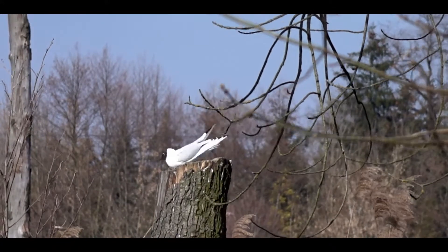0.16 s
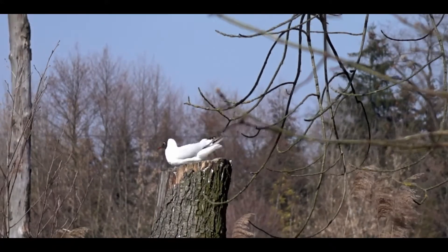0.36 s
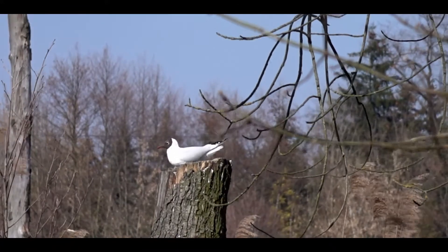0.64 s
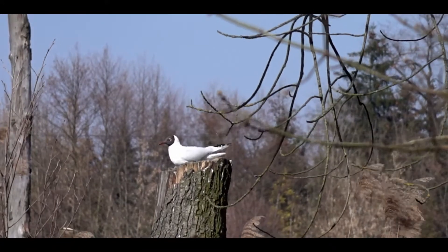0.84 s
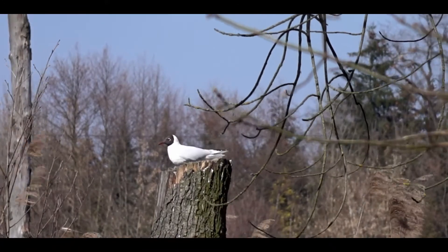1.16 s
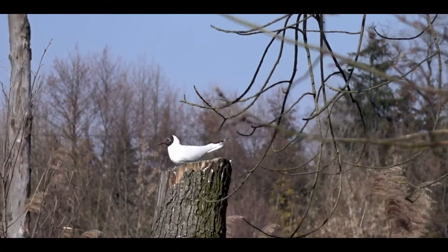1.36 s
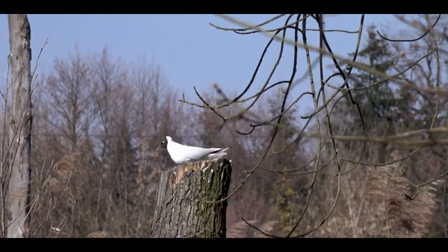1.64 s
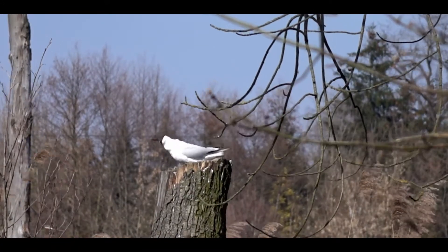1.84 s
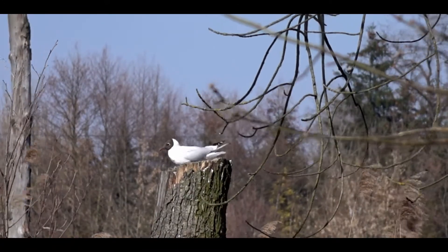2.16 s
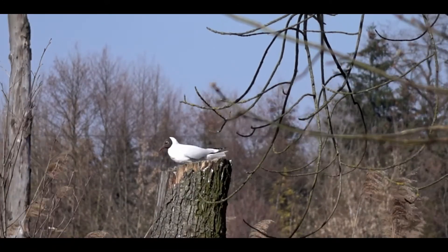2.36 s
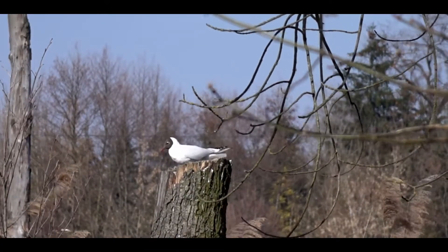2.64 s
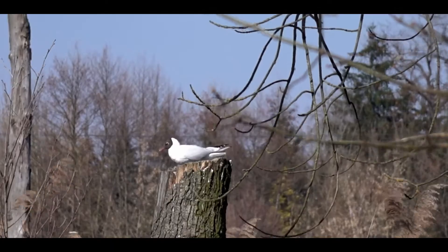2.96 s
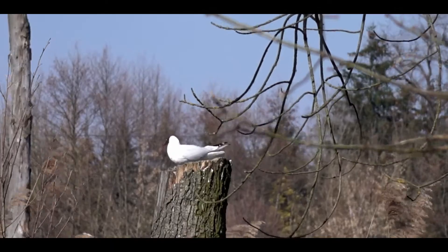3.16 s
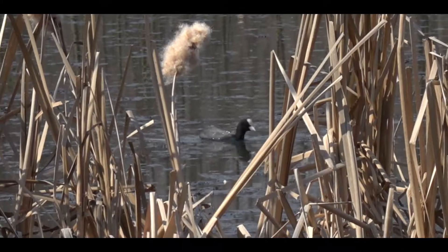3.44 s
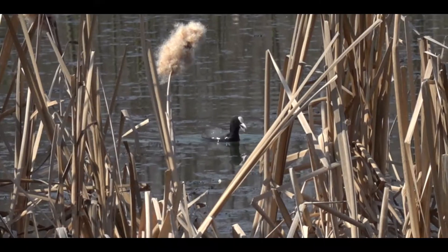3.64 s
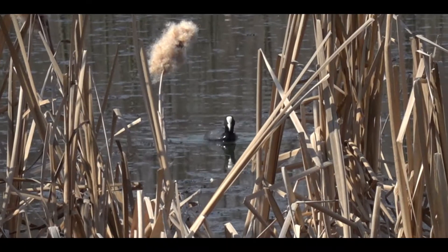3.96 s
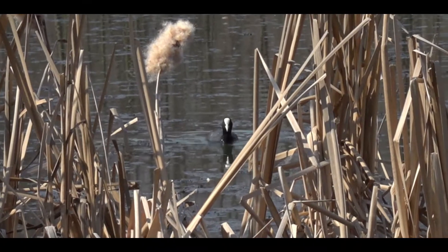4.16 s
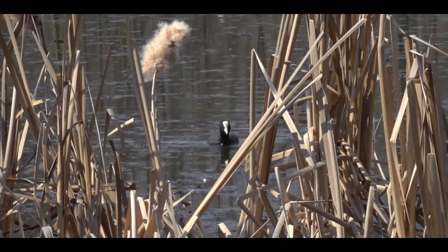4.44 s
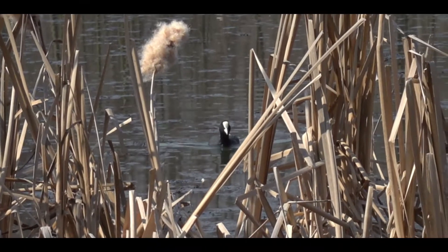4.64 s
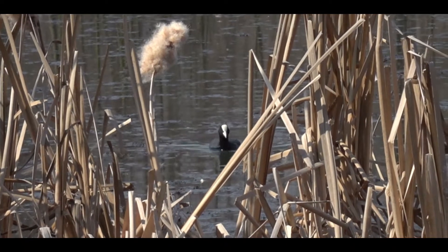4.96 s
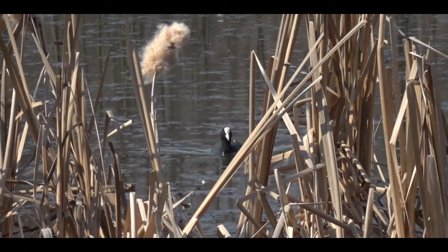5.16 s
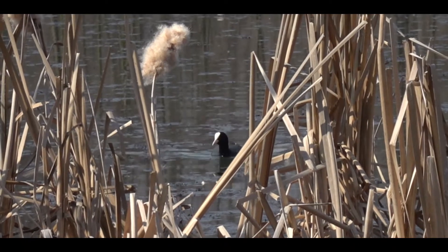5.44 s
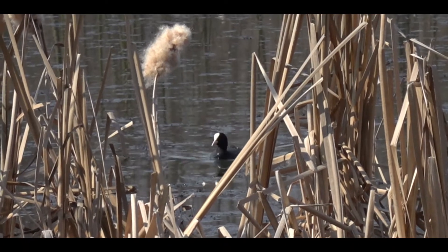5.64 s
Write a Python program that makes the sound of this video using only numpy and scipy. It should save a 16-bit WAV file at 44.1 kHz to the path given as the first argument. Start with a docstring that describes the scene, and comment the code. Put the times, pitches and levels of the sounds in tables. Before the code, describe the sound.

A large colony of gulls calls throughout over a shallow lake, a dense chorus of overlapping cries that swells and ebbs. From the start, closer gulls give harsh, rattling cries and short yelps, with a light echo off the trees. Low wind rumbles on the microphone, gusting at the very beginning and again around 3 to 3.5 seconds. A high, wheezy shriek and two soft, dull mews come between 1 and 1.6 seconds, and more shrieks follow near 2.6 and 4 seconds. A small songbird twitters faintly at about 3 seconds, followed by a run of quick gull yelps. Just after 4 seconds the wind dies down and the flock eases slightly. The loudest shriek comes at about 4.7 seconds, trailed by weaker ones. A few hoarse cries from 5.4 seconds to nearly 6 seconds close over the continuing chorus.

```python
"""A colony of black-headed gulls calls over a shallow lake, each call a harmonic tone on a pitch arch,
most of them chopped into a rattle of about ninety bursts a second. From the start, close gulls cry and
yelp over the flock, the trees echo and wind rumbles at the microphone. Shrieks and two soft mews join
after 1 s, and a songbird twitters at 3 s. Just after 4 s the wind dies down; the loudest shriek follows
at 4.7 s, and a few hoarse cries end the scene."""
import sys
import numpy as np
from scipy import signal
from scipy.fft import rfft, irfft, next_fast_len
from scipy.io import wavfile
from scipy.ndimage import uniform_filter1d

SR = 44100
rng = np.random.default_rng(int(sys.argv[2]) if len(sys.argv) > 2 else 0)


def materialize(psi):
    """Save the field psi as 16-bit PCM at rate SR to the path in sys.argv[1].

    A 1-D psi becomes a single channel; in a 2-D psi each row is a channel.
    """
    bounded = np.clip(np.atleast_2d(psi).T, -1, 1)
    quanta = np.round(bounded * 32767).astype(np.int16)
    wavfile.write(sys.argv[1], SR, quanta)


N = 255339
TIME = np.arange(N) / SR


def gain_of(db):
    """The decibel scale: 20 dB is a factor of ten in amplitude."""
    return 10 ** (np.asarray(db) / 20)


def unit_rms(x):
    """Normalisation to a mean power of 1."""
    return x / np.sqrt(np.mean(x ** 2) + 1e-20)


def value_at(points, hz):
    """Interpolation along a logarithmic frequency axis."""
    f, value = np.transpose(points)
    return np.interp(np.log(hz + 1), np.log(f + 1), value)


def add(mix, s, sound):
    """Superposition: a sound joins the mix at time s."""
    at = round(s * SR)
    sound = sound[max(-at, 0):]
    part = mix[max(at, 0):][:len(sound)]
    part += sound[:len(part)]


def wander(t, per_s):
    """Random modulation: straight lines join per_s Gaussian values a second."""
    knots = rng.standard_normal(2048)
    return np.interp(t * per_s, np.arange(len(knots)), knots)


def bump(s, width_s):
    """A Gaussian envelope of height 1 around time s."""
    return np.exp(-((TIME - s) / width_s) ** 2)


def coloured(x, db_at, scatter_rad=0):
    """Linear filtering by a curve from Hz to dB, to rms 1; scatter shifts the partials' phases."""
    size = next_fast_len(len(x) + 512)
    hz = np.fft.rfftfreq(size, 1 / SR)
    response = gain_of(db_at(hz)) * np.exp(1j * scatter_rad * wander(hz, 1 / 700))
    return unit_rms(irfft(rfft(x, size) * response, size)[:len(x)])


def noise(spectrum):
    """Spectral shaping of white noise."""
    return coloured(rng.standard_normal(N), lambda hz: value_at(spectrum, hz))


def still_air():
    """Stationary noise: the faint ambient floor."""
    # (frequency [Hz], relative spectral density [dB])
    spectrum = [(20, -17), (70, 3), (130, -4), (280, -12), (600, -4.5), (2000, -14), (8000, -26),
                (15500, -59)]
    return gain_of(-34.5) * noise(spectrum)


def wind(breeze_db=-23.5, calm_db=-36.5, calm_at_s=4.14, fade_s=.12):
    """Turbulence at the microphone: a low rumble that gusts, then dies down."""
    # (frequency [Hz], relative spectral density [dB])
    spectrum = [(3, -16), (8, 6), (15, 2), (28, -13.5), (45, -12), (70, -21.5), (120, -34.5), (250, -35.5),
                (500, -43.5), (1500, -75)]
    # (time [s], half width [s], rise [dB])
    gusts = [(0.23, .14, 7), (2.1, 0.17, 0.5), (2.973, 0.11, 8), (3.56, 0.39, 4.5)]
    db = np.interp(TIME, [calm_at_s, calm_at_s + fade_s], [breeze_db, calm_db])
    db += sum(rise_db * bump(s, width_s) for s, width_s, rise_db in gusts)
    db += 2 * wander(TIME, per_s=9)
    return gain_of(db) * noise(spectrum)


def shore_echo(x, onset_s=0.0094):
    """Reverberation: scattering off trees and reeds leaves a tail whose treble dies first."""
    # (frequency [Hz], time to decay by 60 dB [s])
    decay_times = [(300, 1), (2000, 1.0), (5000, 0.59), (10000, 0.79), (16000, 0.22)]
    reflections = rng.standard_normal(SR) * (rng.random(SR) < .05)
    hz, t, bands = signal.stft(reflections, SR, nperseg=256)
    decay = gain_of(-60 * t / value_at(decay_times, hz)[:, None])
    onset = 1 - np.exp(-t / onset_s)
    tail = signal.istft(bands * decay * onset, SR, nperseg=256)[1]
    return signal.fftconvolve(x, tail / np.linalg.norm(tail))[:N]


def syrinx(length, swell_db, pitches, rattle_hz, rasp, depth=0.97, hiss=1.0, doubling=0.33,
           edge_s=0.031, drop=0, drop_s=.016, sweep=0):
    """Amplitude modulation chops a harmonic tone into bursts; rasp adds pitch jitter and turbulence."""
    t = np.arange(round(length * SR)) / SR
    progress = t / length
    beat = np.cumsum(rattle_hz * (1 + 0.1 * wander(t, 57.3))) / SR
    burst = np.tanh(2.218 * np.sin(np.pi * beat) ** 2)  # flat-topped, with short gaps
    detune = rng.standard_normal(64)[beat.astype(int)]  # one value a burst
    hz = np.polyval(np.polyfit([0, .5, 1], pitches, 2), progress)
    hz *= 1 - drop * np.exp((t - length) / drop_s)  # the pitch collapses at the end
    hz *= 1 + sweep * rasp * (beat % 1 - .5)  # hoarse bursts chirp upward
    hz *= 1 + .045 * rasp * detune
    jitter = rasp * 0.0523 * wander(t, 900)
    hz *= 1 + 0.04504 * (burst - .85) + jitter  # each burst lifts at its middle
    phase = 2 * np.pi * np.cumsum(hz) / SR
    phasor = np.exp(1j * phase)
    tone = (phasor * (1 - phasor ** 16) / (1 - phasor + 1e-9)).real  # 16 equal harmonics
    # fits of period doubling put lines halfway between the harmonics
    tone *= 1 + doubling * wander(t, 248.2) * np.cos(phase / 2)
    # turbulence takes over toward the treble
    turbulence = signal.lfilter([1, -.85], [1], rng.standard_normal(SR // 2))[:len(t)]
    voice = (1 - rasp) * unit_rms(tone) + hiss * rasp * turbulence
    gate = 1 - depth + depth * burst
    swell = gain_of(wander(t, 81.0) + swell_db * progress)
    edges = signal.windows.tukey(len(t), np.clip(2 * edge_s / length, 0, 1))
    return unit_rms(voice * gate * swell * edges)


def crowd(spectrum, count, pitch_hz, spread_octaves, rasp, echo_db):
    """Incoherent addition: cries of random pitch, length and distance merge, held at a steady level."""
    birds = np.zeros(N)
    for k, (when, duration, tilt, pitch, distance) in enumerate(rng.random((count, 5))):
        middle_hz = pitch_hz * 2 ** (spread_octaves * (2 * pitch - 1))
        pitches = middle_hz * np.array([.76 + .32 * tilt, 1, 1.04 - .26 * tilt])  # some rise, some fall
        cry = syrinx(.12 + .2 * duration, 0, pitches, 70 + 25 * tilt, rasp)
        start_s = (k + when) / count * (N / SR + .3) - .3
        add(birds, start_s, gain_of(-9 * distance) * cry)
    birds += gain_of(echo_db) * shore_echo(birds)
    # the sum is flattened, then takes the colour of the throats and the air between
    f, power = signal.welch(birds, SR, nperseg=512)
    power += 0.01 * power.mean()
    birds = coloured(birds, lambda hz: value_at(spectrum, hz) - 10 * np.log10(np.interp(hz, f, power)))
    return birds / np.sqrt(uniform_filter1d(birds ** 2, SR // 8) + 1e-6)


def chorus(colony_follow=.25):
    """Slow amplitude modulation: the flock swells, ebbs and pauses; the far colony follows a little."""
    # both: (frequency [Hz], relative spectral density [dB])
    colony_spectrum = [(150, -8.5), (250, -15.5), (525, -11), (635, -4.5), (717, -2.5), (809, -2),
                       (1030, -1.5), (1220, -1.5), (1330, 1), (1430, 3.5), (1920, 5), (2160, -8.5),
                       (3160, -25), (3510, -19.5), (15500, -44.5)]
    flock_spectrum = [(300, -23.5), (1000, -21.5), (1500, -4), (1900, 4.5), (2250, 0), (2600, -6),
                      (3200, -10.5), (4400, -9.5), (5500, -16.5), (8000, -35), (10500, -54), (15500, -72)]
    # strength of the calling: (time [s], relative level [dB])
    calling = [(0.0, -32), (0.14, -23.5), (0.48, -21), (1.1, -23), (2.42, -18.5), (2.69, -20.5),
               (2.95, -21.5), (3.18, -20.5), (3.47, -22), (3.69, -22), (3.98, -19.5), (4.18, -23.5),
               (4.45, -25), (4.66, -25.5), (5.47, -21), (5.66, -22.5), (5.79, -23)]
    # (time [s], half width [s], flock change [dB], colony change [dB])
    pauses = [(1.107, 0.054, -6.5, -2.5), (1.536, 0.054, -11, 2.5), (4.297, 0.1, -3.5, -8),
              (5.362, 0.087, -7.5, -1.5)]
    calling_db = np.interp(TIME, *np.transpose(calling))
    flock_db = calling_db - 2.0
    colony_db = -18.5 + colony_follow * calling_db
    for s, width_s, near_db, far_db in pauses:
        flock_db += near_db * bump(s, width_s)
        colony_db += far_db * bump(s, width_s)
    flock = crowd(flock_spectrum, count=80, pitch_hz=964.6, spread_octaves=.3, rasp=0.2774, echo_db=-3.5)
    colony = crowd(colony_spectrum, count=185, pitch_hz=798.1, spread_octaves=.55, rasp=0.3197,
                   echo_db=-2)
    return gain_of(flock_db) * flock + gain_of(colony_db) * colony


def songbird():
    """Frequency modulation of a pure tone: quick gliding whistles with a slight tremble."""
    # (time [s], length [s], level [dB], first pitch [Hz], last pitch [Hz])
    notes = [(3.015, 0.029, -38, 4670, 5000), (3.044, 0.023, -37, 5550, 4100),
             (3.065, 0.028, -33, 4700, 5800), (3.09, 0.027, -36, 5400, 4400),
             (3.388, 0.083, -51, 8100, 8400), (3.453, 0.041, -45, 8070, 8400)]
    song = np.zeros(N)
    for s, length, db, first_hz, last_hz in notes:
        t = np.arange(round(length * SR)) / SR
        hz = np.linspace(first_hz, last_hz, len(t)) * (1 + 0.04 * wander(t, 380))
        whistle = np.sin(2 * np.pi * np.cumsum(hz) / SR) * np.hanning(len(t))
        add(song, s, gain_of(db) * unit_rms(whistle))
    return song


def near_calls(rows, throat, arch_octaves, rattle_hz, doubling=0.4, hiss=0.91, wheeze_leak=0,
               air_loss=0, shut_db_per_octave=-8, **voicing):
    """Source and filter: the syrinx sounds through throat and beak, brightest when the beak is widest."""
    wheeze_hz = 9450, 11400  # the wheeze band fades in over this range

    def call(length, db, pitch, glide, rasp=0.25, treble_db=0, ring_hz=3000, ring_db=0, wheeze_db=0):
        def throat_db(hz):
            treble = treble_db * np.clip(np.log2((hz + 1) / 2200), 0, 1)
            ring = ring_db / (1 + ((hz / ring_hz - 1) / 0.07) ** 2)
            absorption_db = air_loss * min(db + 17, 0)  # air dulls the weaker, farther calls
            top = (wheeze_db + absorption_db) * np.interp(hz, wheeze_hz, [0, 1])
            return value_at(throat, hz) + treble + ring + top

        def shut_beak_db(hz):
            dulling = shut_db_per_octave * np.log2(np.maximum(hz / 3800, 1))
            return dulling * np.interp(hz, wheeze_hz, [1, 1 - wheeze_leak])

        pitches = pitch * 2 ** np.array([-arch_octaves - glide / 2, 0, -arch_octaves + glide / 2])
        swell_db = 20 * glide  # a rising call grows louder, a falling one fades
        slowed_hz = rattle_hz * (1 - .5 * rasp)  # hoarseness slows the rattle
        voice = syrinx(length, swell_db, pitches, slowed_hz, rasp, doubling=doubling, hiss=hiss, **voicing)
        wide = coloured(voice, throat_db, scatter_rad=1.3)
        half_shut = coloured(wide, shut_beak_db)
        opening = np.sin(np.linspace(0, np.pi, len(voice)))
        return opening * wide + (1 - opening) * half_shut

    direct, scattered = np.zeros((2, N))
    for s, length, db, *shape in rows:
        sound = call(length, db, *shape)
        add(direct, s, gain_of(db) * sound)
        add(scattered, s, gain_of(-17 + 0.71 * db) * sound)  # the echo loses less with distance
    return direct + shore_echo(scattered)


def mews():
    """A low throat resonance favours the first harmonics: soft, dull calls."""
    # (time [s], length [s], level [dB], pitch [Hz], glide [octaves])
    calls = [(1.17, 0.158, -29, 835, -0.058), (1.50, 0.108, -29.5, 1323, .05)]
    # (frequency [Hz], relative gain [dB])
    throat = [(400, -23), (850, -1), (1350, 4), (2500, -26), (8000, -50)]
    return near_calls(calls, throat, arch_octaves=.1, rattle_hz=80, depth=1.0, edge_s=0.023, drop=0.057)


def yelps():
    """Shallow modulation leaves these short calls clear, with hardly any rattle."""
    # (time [s], length [s], level [dB], pitch [Hz], glide [octaves])
    calls = [ (.145, .056, -23, 1110, -0.19), (1.01, 0.024, -24, 1153, -0.048),
             (1.07, 0.068, -28.5, 1130, -0.055), (1.38, 0.1, -24.5, 1082, -0.13),
             (3.25, 0.06, -17, 1134, 0.167), (3.385, 0.045, -21, 1100, 0.2),
             (3.44, 0.085, -31, 1058, -0.15), (3.58, 0.112, -30, 1203, 0.049),
             (3.76, 0.057, -23.5, 1157, 0.01), (3.90, 0.063, -26, 1130, 0.092),
             (4.12, 0.054, -27.5, 1130, 0.068)]
    # (frequency [Hz], relative gain [dB])
    throat = [(500, -40), (1100, -23), (2000, 10), (2350, -2.5), (3300, -18), (4500, -17), (10000, -45)]
    return near_calls(calls, throat, arch_octaves=0.0697, rattle_hz=104.3, depth=0.13, edge_s=0.017,
                      drop=0.028)


def shrieks():
    """A narrow throat resonance rings in the upper partials of these high, wheezy calls."""
    # (time [s], length [s], level [dB], pitch [Hz], glide [octaves], rasp [0-1], treble [dB],
    #  resonance [Hz], resonance gain [dB], wheeze [dB])
    calls = [ (1.145, 0.18, -27, 1115, 0.047, .27, 5, 3000, 10, 3),
             (1.33, 0.16, -39.5, 1130, 0, 0.13, -4, 5500, 11, -4),
             (2.56, 0.2, -25, 1207, 0.054, 0.23, 13, 3110, 20.2, -3),
             (3.72, 0.23, -33.5, 1240, .04, 0.36, -13, 3730, 29, 0),
             (3.982, .218, -26.5, 1178, -.06, .33, 0.5, 3290, 13, 4),
             (4.68, .045, -28.5, 1145, .1, 0.52, -2, 3500, 11, -2),
             (4.72, 0.13, -15.5, 1258, 0.0012, 0.303, -5, 3710, 12.7, -1),
             (4.845, 0.15, -29, 1343, -.1, 0.26, -1, 3800, 3, -2),
             (5.025, 0.12, -33, 1218, 0.03, 0.23, 1, 7800, 7, -9),
             (5.54, 0.16, -33, 1204, 0, .8, -8, 7900, 9.6, -12)]
    # (frequency [Hz], relative gain [dB])
    throat = [(600, -44), (1300, 1), (2500, 8.5), (3700, 10), (5000, 10.5), (6000, 10), (7000, 1.5),
              (8600, 2.5), (10300, -12.5), (12500, -12.5), (16000, -17)]
    return near_calls(calls, throat, arch_octaves=.095, rattle_hz=97, depth=0.91, edge_s=.004, drop=0.019,
                      sweep=.17, doubling=0.48, hiss=0.86, shut_db_per_octave=-11.5, wheeze_leak=0.98)


def cries():
    """Deep modulation makes a harsh rattle, coloured by the formants of the throat."""
    # (time [s], length [s], level [dB], pitch [Hz], glide [octaves], rasp [0-1], treble [dB])
    calls = [ (-.08, 0.16, -17, 895, 0.07, 0.23, 3), (.185, .22, -17.5, 866, .27, .36, -1.5),
             (.38, 0.096, -26.5, 764, -0.49, 0.16, -2), (.52, 0.2, -16.7, 910.4, .18, .38, 0),
             (.83, 0.11, -21, 936, 0.15, 0.56, 3.5), (.93, 0.12, -20.5, 915, -.03, 0.37, 0),
             (1.2, 0.17, -24, 850, .15, 0.41, -8), (1.59, 0.15, -25, 960, -.05, 0.42, 10),
             (1.75, 0.23, -19.5, 990, -.13, 0.49, -2), (1.95, 0.2, -27, 1010, .03, 0.77, 1),
             (2.23, 0.19, -17.5, 981, 0, 0.61, -11.5), (2.31, .26, -25.5, 994, -.1, 0.34, 1.5),
             (2.76, 0.19, -25, 968, .02, .24, 13), (2.93, 0.11, -22, 985, .1, 0.58, -6),
             (3.03, 0.21, -21, 926, -.17, 0.31, -5), (3.72, .13, -27, 900, .04, 0.68, -11),
             (3.87, .11, -22, 930, 0, 0.82, -10), (3.99, .15, -23, 930, -.04, 0.2, -1),
             (4.41, 0.16, -30, 900, .04, 0.74, -2.5), (4.54, 0.17, -27.5, 880, -.06, 0.56, 1),
             (5.40, 0.16, -25.5, 835, .1, 0.55, -12), (5.54, 0.14, -24.5, 860, 0, 0.78, -5.5),
             (5.70, 0.23, -24, 880, .1, 0.62, -3)]
    # (frequency [Hz], relative gain [dB])
    throat = [(400, -56), (900, -12.5), (1350, -3), (1700, 3), (1950, 6), (2300, -20.5), (2750, -5.5),
              (3300, -30), (3750, -6), (4450, -3), (5400, -15), (7200, -20.5), (8800, -28.5),
              (10300, -36.5), (11500, -36.5), (13700, -39), (16000, -51)]
    return near_calls(calls, throat, arch_octaves=.075, rattle_hz=110, depth=0.77, edge_s=0.021,
                      drop=0.1477, sweep=0.038, hiss=0.84, air_loss=1.0, shut_db_per_octave=-3.5)


def scene():
    """Superposition of near birds, their echoes, the chorus, wind and still air."""
    song = songbird()
    close_gulls = cries() + shrieks() + yelps() + mews()
    song_echo = gain_of(-3) * shore_echo(song)
    return (close_gulls + song + song_echo + chorus() + wind() + still_air())[None]


def record(dry, cutoff_hz=15750):
    """Band limiting by a steep low-pass filter."""
    lowpass = signal.firwin(511, cutoff_hz, window=("kaiser", 9), fs=SR)
    return signal.oaconvolve(dry, lowpass[None], "same")


dry = scene()
out = record(dry)
materialize(out)
```